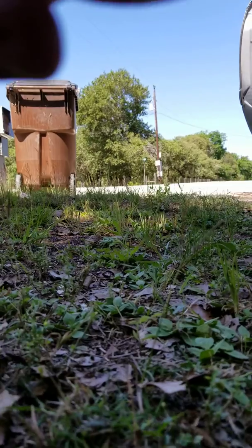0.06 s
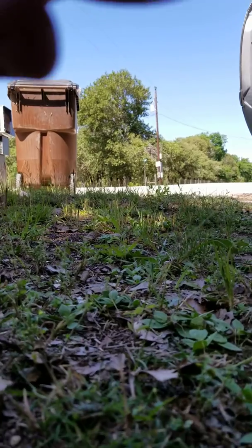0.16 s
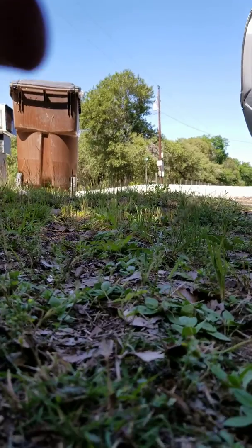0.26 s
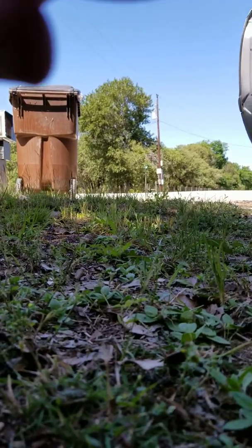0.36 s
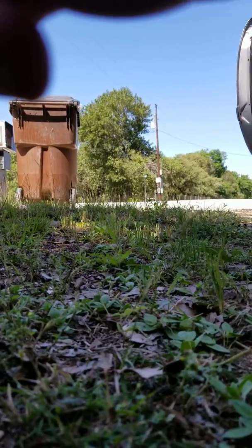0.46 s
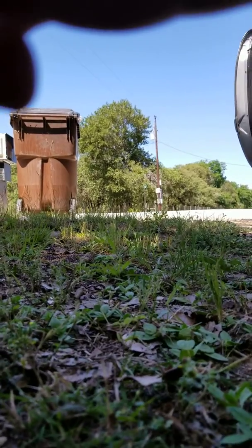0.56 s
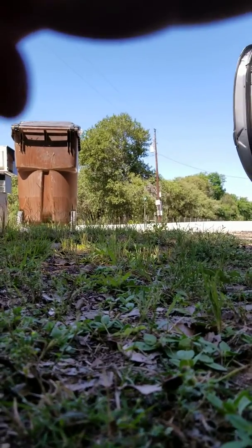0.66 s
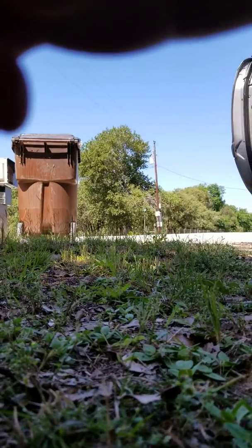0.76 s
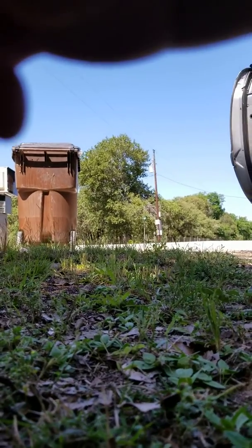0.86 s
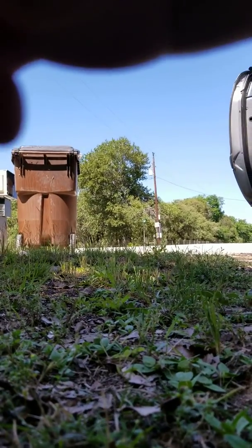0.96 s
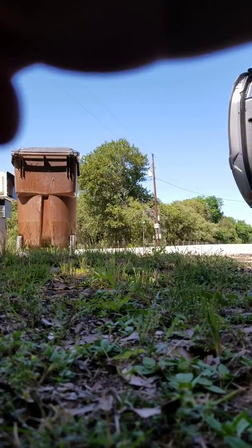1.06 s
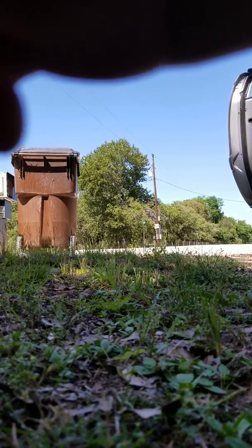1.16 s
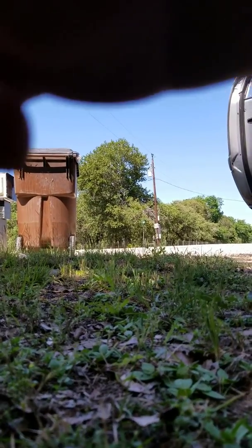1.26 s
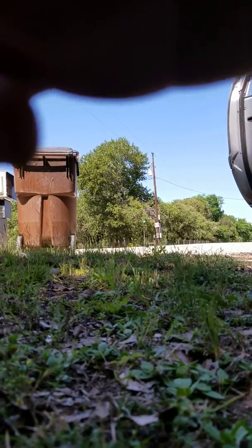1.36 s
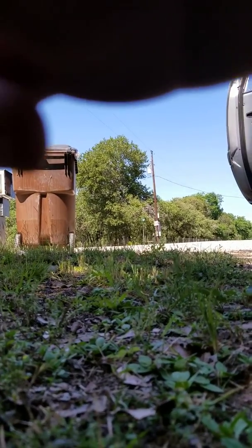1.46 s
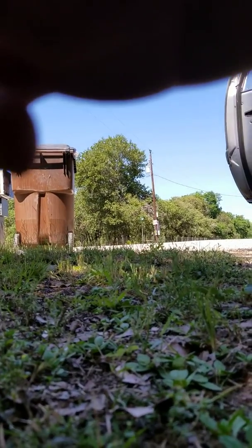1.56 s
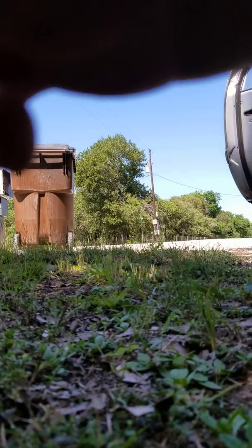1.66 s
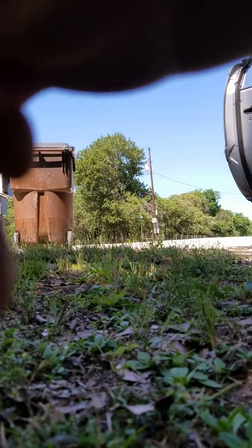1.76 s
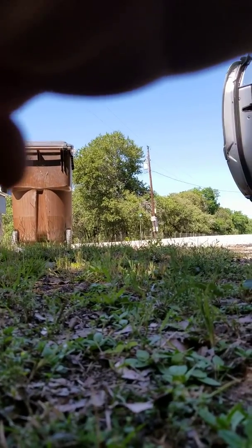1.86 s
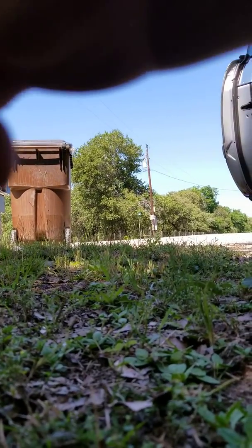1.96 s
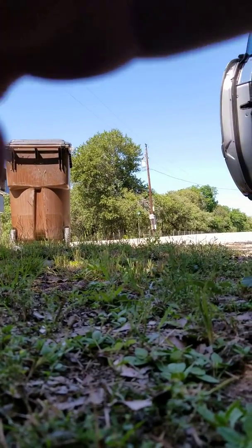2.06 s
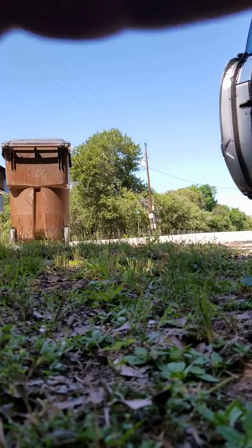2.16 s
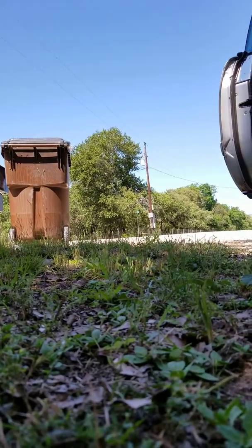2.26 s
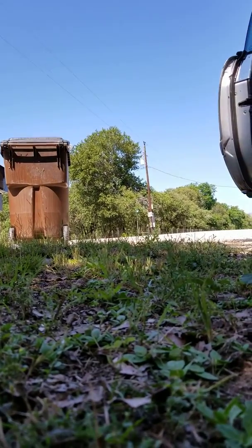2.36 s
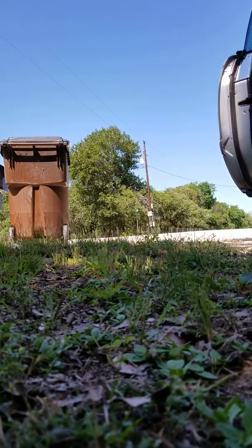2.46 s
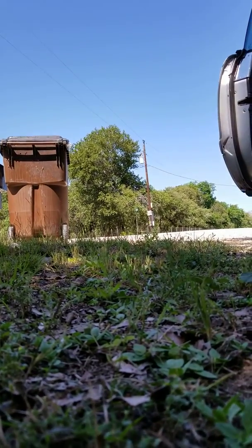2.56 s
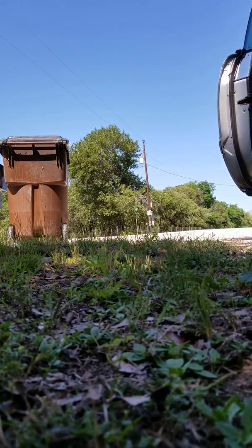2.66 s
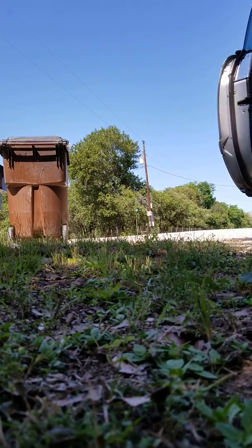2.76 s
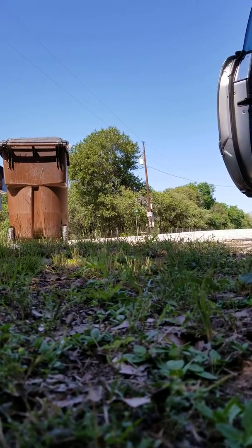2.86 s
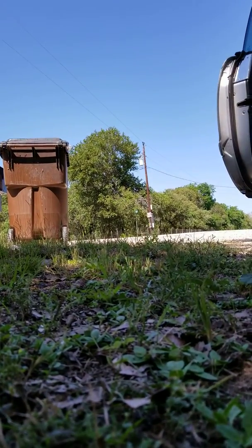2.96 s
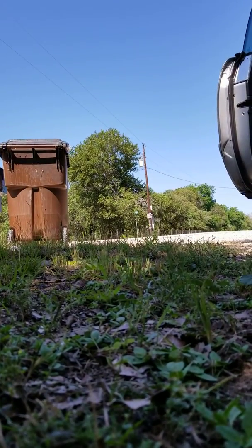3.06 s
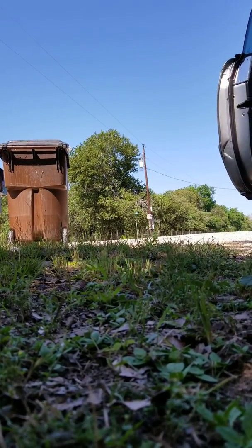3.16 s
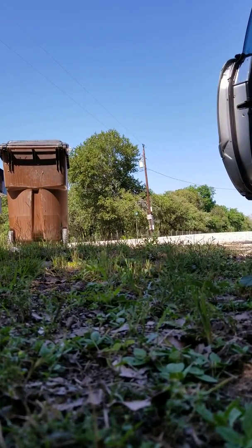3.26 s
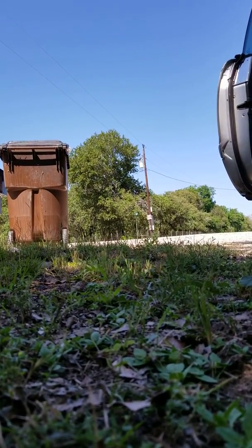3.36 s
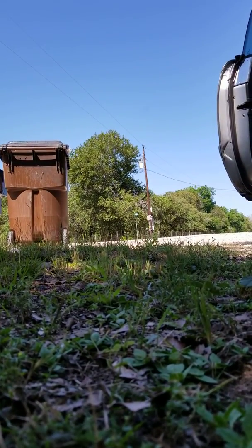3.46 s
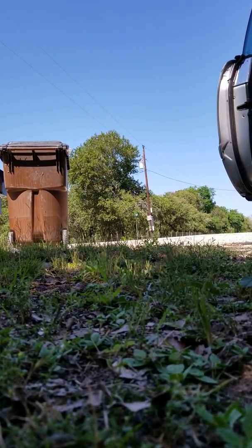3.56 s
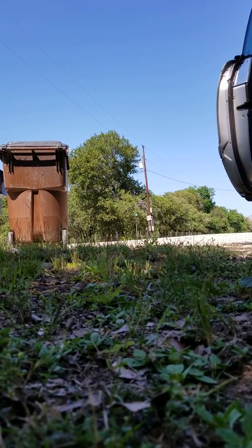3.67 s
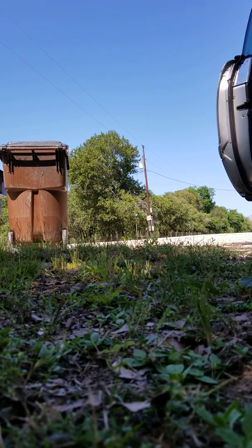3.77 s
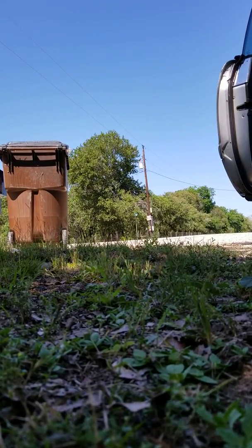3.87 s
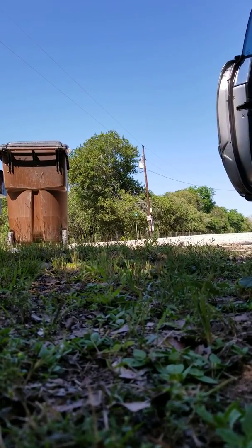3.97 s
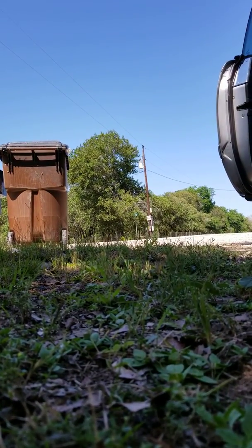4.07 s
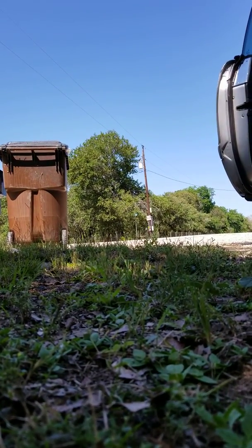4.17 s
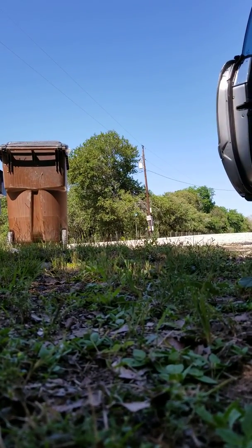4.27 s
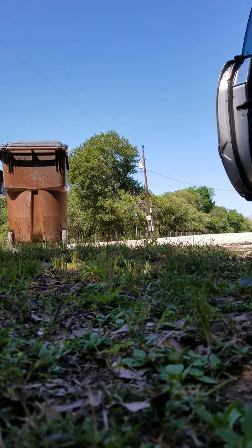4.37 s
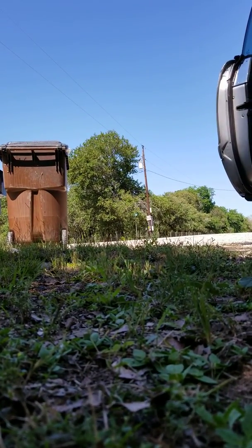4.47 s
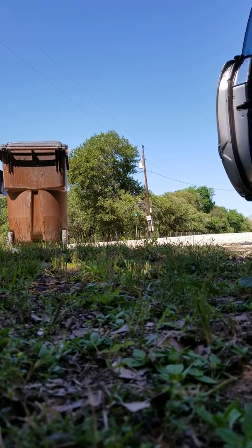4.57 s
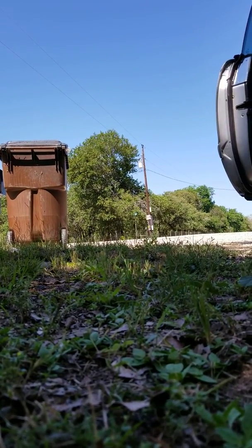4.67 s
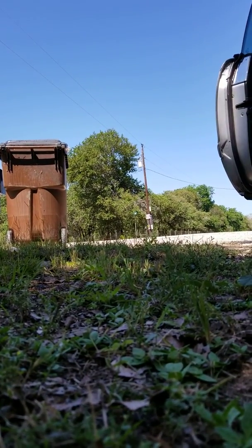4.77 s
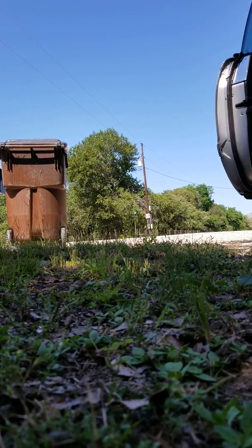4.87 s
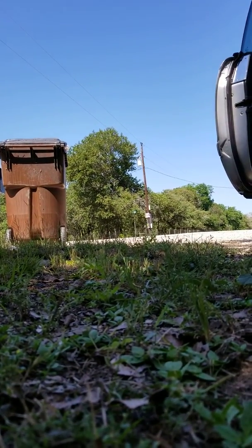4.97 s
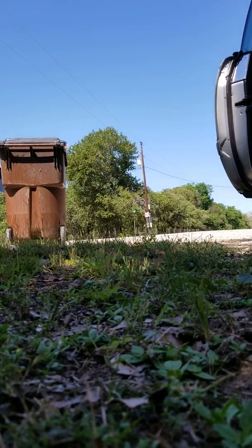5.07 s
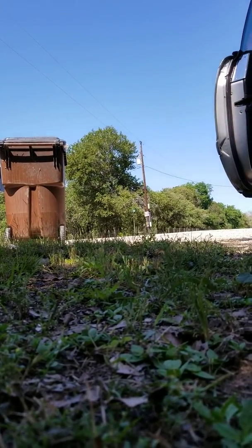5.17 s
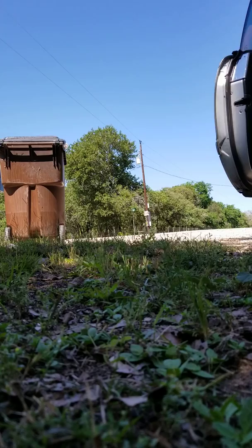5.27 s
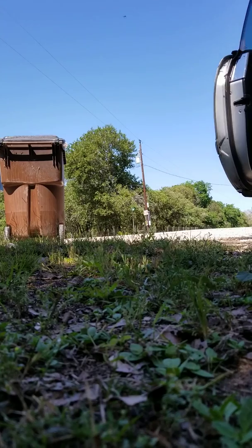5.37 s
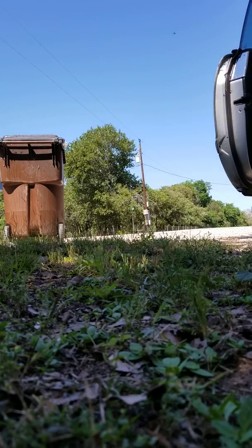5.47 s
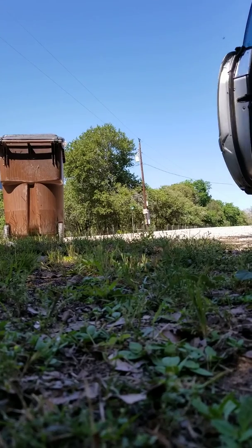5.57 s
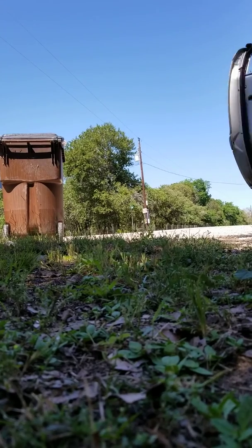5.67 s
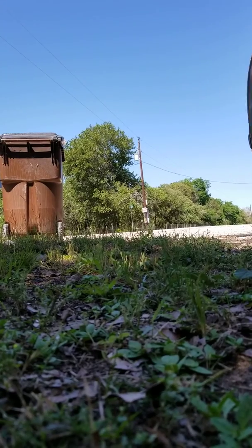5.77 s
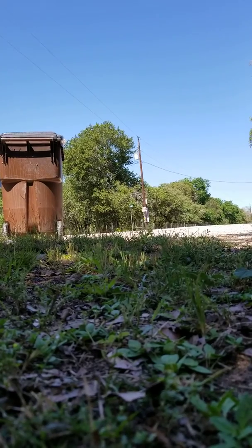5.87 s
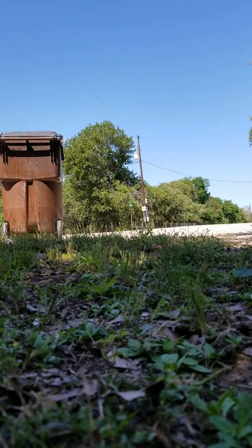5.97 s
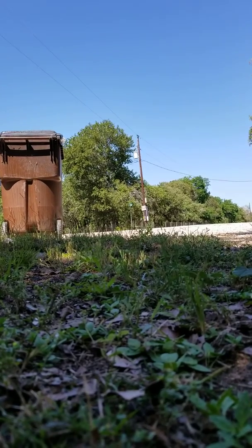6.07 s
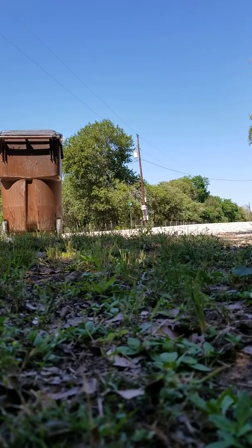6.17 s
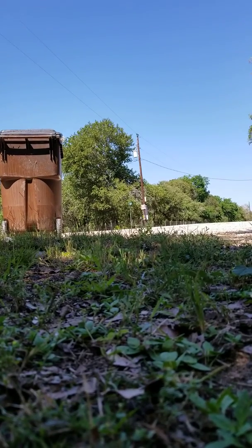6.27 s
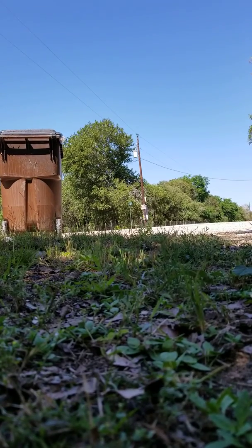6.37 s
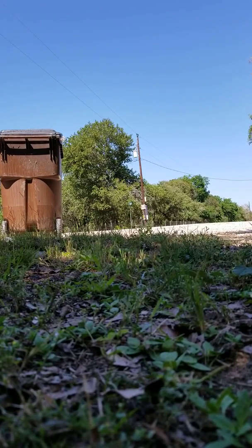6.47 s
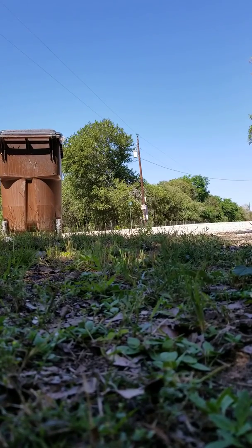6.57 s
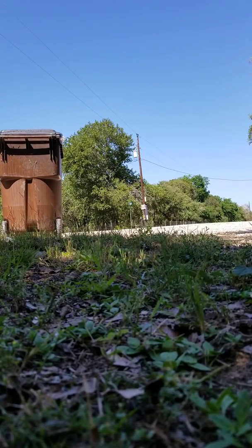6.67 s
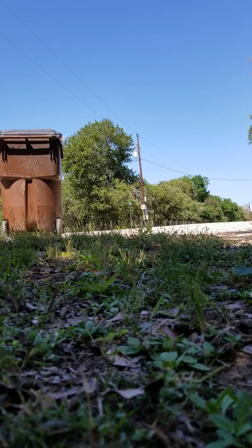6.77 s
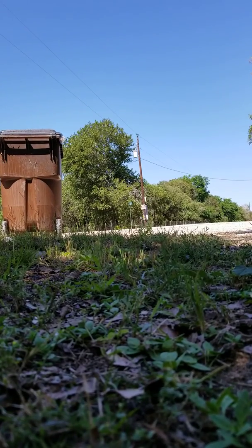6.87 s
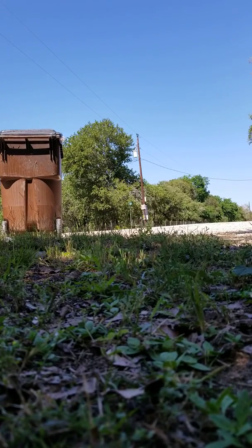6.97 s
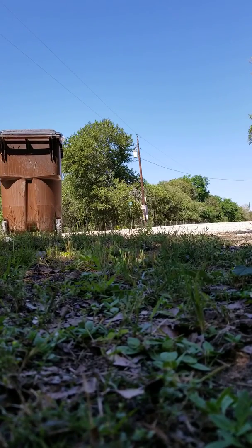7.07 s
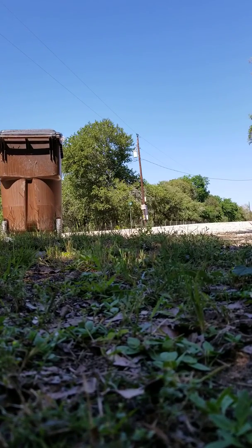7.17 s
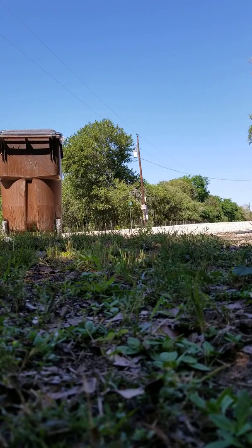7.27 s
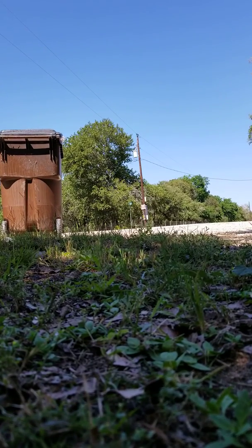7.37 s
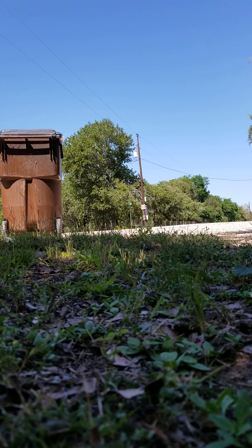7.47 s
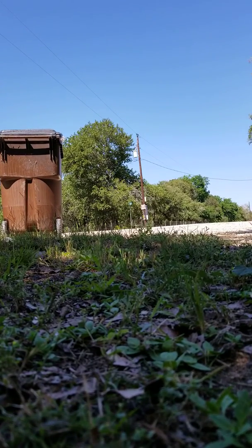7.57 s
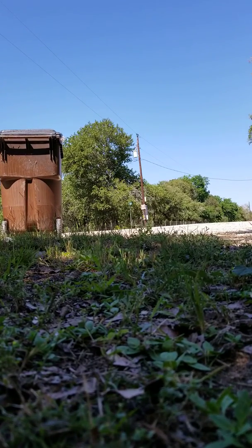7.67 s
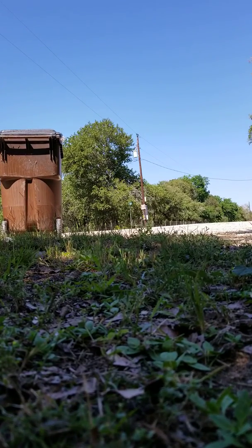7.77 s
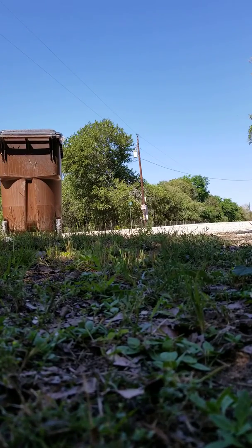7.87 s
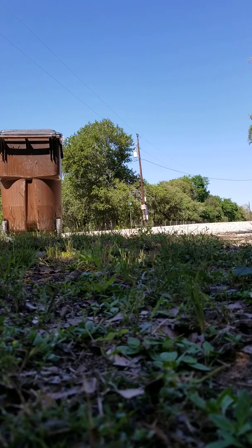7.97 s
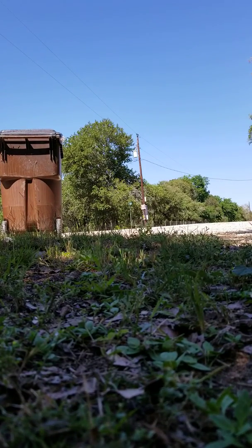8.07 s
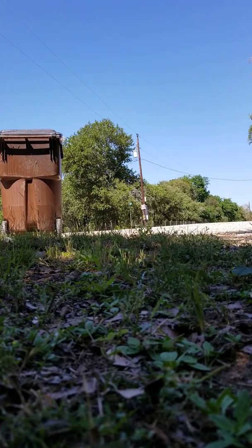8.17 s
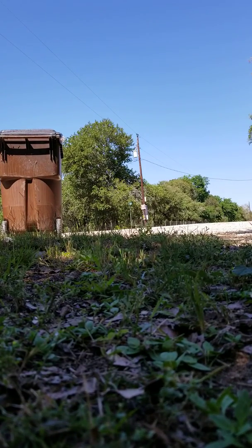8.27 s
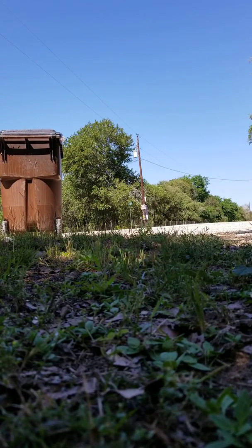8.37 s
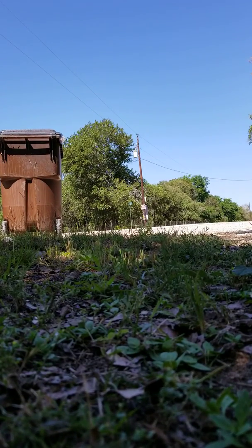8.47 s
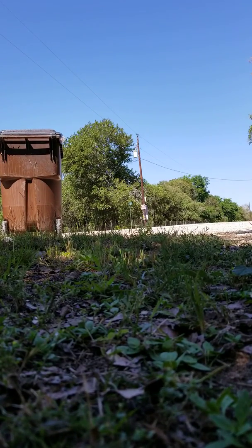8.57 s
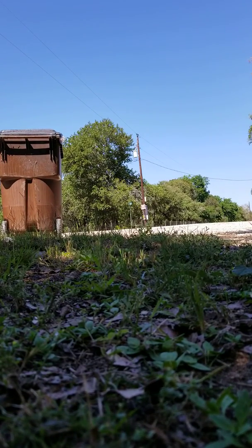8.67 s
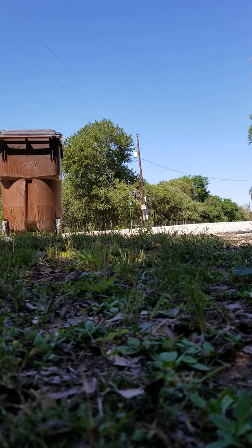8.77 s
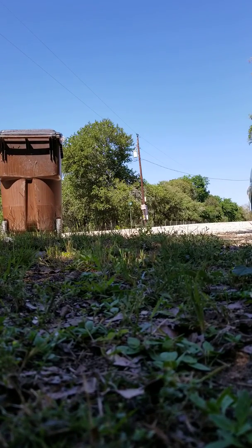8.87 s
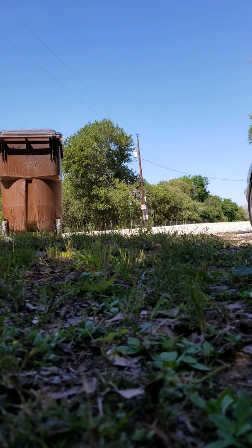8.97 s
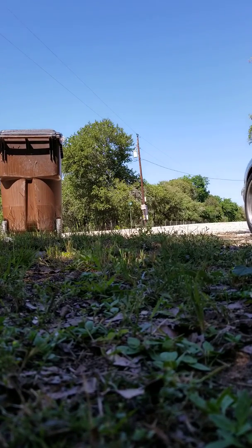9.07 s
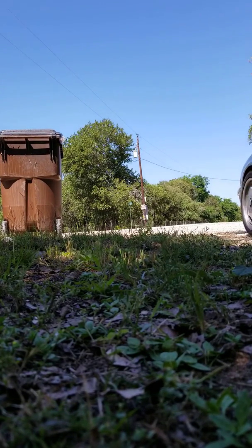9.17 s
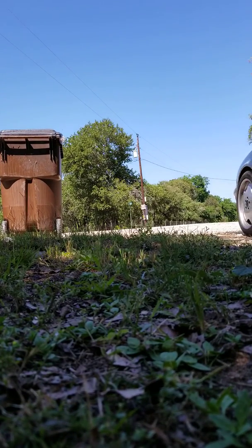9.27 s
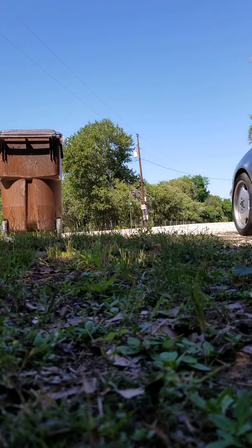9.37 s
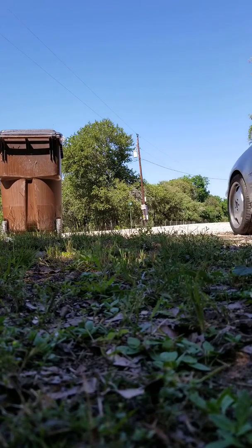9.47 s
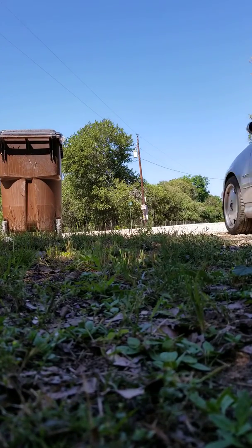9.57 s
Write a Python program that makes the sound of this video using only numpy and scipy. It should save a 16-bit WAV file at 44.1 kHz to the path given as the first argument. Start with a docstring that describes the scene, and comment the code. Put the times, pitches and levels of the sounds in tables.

```python
"""Beside a car, two microphones in a phone held low over the grass: a loud V8 rises out of quiet and lopes at
idle. Unequal firings ring the pipes, gas rasps and the valve gear ticks; right at the phone, fingers rub, tap
and knock. After a soft bump on the phone and a grinding double clunk the engine sags under load, and the car
creeps off on a short blip. Then it pulls away hard: every firing blasts over a crackling jet, pops crack in the
pipes, and the loudest booms overload the microphones."""
import sys
import numpy as np
from scipy import signal
from scipy.fft import rfft, irfft, next_fast_len
from scipy.io import wavfile
from scipy.ndimage import uniform_filter1d

SR = 44100
rng = np.random.default_rng(int(sys.argv[2]) if len(sys.argv) > 2 else 0)


def log_audio(samples):
    """Write samples as a 16-bit WAV file to the path given in sys.argv[1]."""
    # one column per channel
    frames = np.atleast_2d(samples).T
    # limit to full scale, then quantise
    limited = np.clip(frames, -1, 1)
    pcm = np.round(limited * 32767).astype(np.int16)
    wavfile.write(sys.argv[1], SR, pcm)


N = 424683
TIME = np.arange(N) / SR


def amp(db):
    """Decibels to gain."""
    return 10 ** (np.asarray(db) / 20)


def unit(x):
    """Scale to an rms of 1."""
    return x / np.sqrt(np.mean(x ** 2))


def curve(table):
    """The value of a timed table at every sample."""
    return np.interp(TIME, *np.transpose(table))


def pan(db):
    """Left and right gains for a level difference, left minus right, with a mean gain of 1."""
    gains = amp(np.array([[db], [-db]]) / 2)
    return gains / gains.mean()


def colour(x, points, share=1):
    """Causal (minimum-phase) filter with a (Hz, dB) response, so that blows ring after they land."""
    size = 2 * next_fast_len(x.shape[-1] // 2 + SR // 8)
    hz, db = np.transpose(points)
    bin_hz = np.arange(size // 2 + 1) * SR / size + 1
    response_db = share * np.interp(np.log(bin_hz), np.log(hz), db)
    # folding the cepstrum onto positive time makes the filter causal
    cepstrum = irfft(np.log(amp(response_db)))
    cepstrum[1:size // 2] *= 2
    cepstrum[size // 2 + 1:] = 0
    return irfft(rfft(x, size) * np.exp(rfft(cepstrum)), size)[..., :x.shape[-1]]


def hump(hz, below_db, above_db):
    """A broad resonance that has fallen by the given dB two octaves to either side."""
    below = [(hz / 16, 2 * below_db), (hz / 4, below_db), (hz / 2, .8 * below_db)]
    above = [(hz * 2, .6 * above_db), (hz * 4, above_db), (hz * 16, 2 * above_db)]
    return below + [(hz, 0)] + above


def microphone_noise(size, likeness):
    """Noise at the two microphones, partly shared."""
    shared = np.clip(likeness, 0, 1)
    noise = rng.standard_normal((3, size))
    return np.sqrt(shared) * noise[0] + np.sqrt(1 - shared) * noise[1:]


def pulses(turns, places, sizes):
    """A pulse each time the running count of firings reaches one of the places."""
    at = np.searchsorted(turns, places)
    return np.bincount(at, sizes, N + 1)[:N]


def fade(x, seconds):
    """Give every pulse an exponential tail with this time constant."""
    return signal.lfilter([1], [1, -np.exp(-1 / (seconds * SR))], x)


def walk(rate):
    """Chance joined by straight lines through this many random points a second, with a spread near 1."""
    knots = rng.standard_normal(N // 100)
    return np.interp(TIME * rate, np.arange(len(knots)), knots)


def grains(size, per_s, spread_db, seconds):
    """An envelope of small random bursts, some stronger than the rest."""
    sizes = amp(spread_db * np.minimum(rng.exponential(size=size), 4))
    starts = rng.random(size) < per_s / SR
    return unit(fade(sizes * starts, seconds))


def blow(s, db, t60, points, likeness, strike_db, share=1):
    """A sharp strike and a noise burst that dies away in a resonant body, scaled to its peak level."""
    size = SR // 4
    push = microphone_noise(size, likeness) * amp(-60 * TIME[:size] / t60)
    push[:, 0] -= amp(strike_db) * np.sqrt(np.sum(push ** 2) / 2)
    ring = colour(push, points, share)
    out, at = np.zeros((2, N)), int(s * SR)
    out[:, at:at + size] = (ring * amp(db) / np.abs(ring).max())[:, :N - at]
    return out


# how hard the engine works: idle, in gear, a blip, throttle shut, the pull
# (time [s], effort above idle [dB])
EFFORT = [(0.4, -0.5), (3.7, -0.5), (5.0, 0.9), (6.5, 1.8), (6.9, -0.5), (7.2, 2), (7.52, -1), (7.87, 2.5),
          (8.1, -0.5), (8.3, -5.5), (8.45, 0), (8.63, 3), (8.75, 7.5), (8.92, 10.5), (9.15, 11), (9.63, 10)]
FULL_EFFORT_DB = 10.5
# level, dB per dB of effort, dB gained when lugging
BURBLE_DB, BURBLE_PER_EFFORT, BURBLE_LUG_DB = -27, 1.0, 2.0
RASP_DB, RASP_PER_EFFORT, RASP_LUG_DB = -35, 1, -1.1
OVERRUN_BELOW_DB, OVERRUN_RASP = -1.5, 2.7  # throttle shut: rasp added, in dB per dB of effort lost
BLAST_DB, BLAST_PER_EFFORT = -30, 2.4  # blowdown at full effort, and its dB per dB of effort
BLARE_ABOVE_HZ, BLARE_DB_PER_HZ = 79.2, 0.5542  # at high firing rates the blowdown grows into a blare
SWELL_DB, SWELL_S = -14, 0.26  # the exhaust is heard quietly at first, its level rising over the first moments


def exhaust(hz, turns):
    """Speed and effort set the boom, burble, rasp and blowdown; bass reaches the left microphone first."""
    effort_db, lug = curve(EFFORT), lugging(hz)
    overrun_db = np.maximum(OVERRUN_BELOW_DB - effort_db, 0)
    burble_db = BURBLE_DB + BURBLE_PER_EFFORT * effort_db + BURBLE_LUG_DB * lug
    rasp_db = RASP_DB + RASP_PER_EFFORT * effort_db + RASP_LUG_DB * lug + OVERRUN_RASP * overrun_db
    blare_db = BLARE_DB_PER_HZ * np.maximum(hz - BLARE_ABOVE_HZ, 0)
    blast_db = BLAST_DB + BLAST_PER_EFFORT * (effort_db - FULL_EFFORT_DB) + blare_db
    places, sizes, cracks = firings(turns, scatter_db=2.0, jitter=0.036)

    tones = boom(turns, tone_levels(hz, effort_db), effort_db, waver_db=1.25, wobble=0.024)
    tones = tones + lope(turns, effort_db)
    pipes = amp(burble_db) * surge(effort_db) * burble(turns, places, sizes, afterburn=1.0)
    bass = np.array([tones + pipes, np.roll(tones + pipes, 4)])  # 4 samples later on the right

    gas = amp(rasp_db) * rasp(turns, places, cracks, blast_db, crack_db=-9.5, rush_db=6.0, bark_db=-7.5)
    blast = amp(blast_db) * blowdown(turns, places, sizes * cracks ** 0.39,
                                     growl_db=3.5, turbulence_db=0.5, roar_db=-7.5)
    swell = amp(SWELL_DB * np.maximum(1 - TIME / SWELL_S, 0))
    return (bass + muffle(gas + blast, hz, effort_db) + pops()) * swell


# cylinders in firing order (strength [dB], delay [firing intervals], crack [dB])
CYLINDERS = [(-6, 0.0215, 10.5), (0.5, 0.034, 1), (-1.5, -0.1036, 7.5), (-3.5, -0.225, 2), (3, 0.0375, 1),
             (0.5, -0.186, 6.5), (-1.5, 0.059, 8.5), (-2, 0.022, 5)]


def firings(turns, scatter_db, jitter):
    """Place, strength and crack of each firing: every cylinder has its habit, no two burns are alike."""
    index = np.arange(int(turns[-1]) + 1)
    db, delay, crack_db = np.array(CYLINDERS)[index % len(CYLINDERS)].T
    chance = rng.standard_normal((len(index), 3)).T
    places = index + .42 + delay + jitter * chance[0]
    sizes = amp(db + scatter_db * chance[1])
    cracks = amp(crack_db + 3.0 * np.clip(chance[2], -2, 2))
    return places, sizes, cracks


LUG_BELOW_HZ, LUG_RANGE_HZ = 48.2, 3  # firing rates: dragged below its idle speed, the engine lugs


def lugging(hz):
    """0 at idle speed and above, 1 when the load has dragged the engine well below it."""
    return np.clip((LUG_BELOW_HZ - hz) / LUG_RANGE_HZ, 0, 1)


# how loudly the pipes boom on an even tone at idle effort (frequency [Hz], level [dB])
BOOM = [(42, -40.5), (49, -42.5), (55, -26), (63, -23), (97, -23), (122, -27), (160, -23), (200, -25),
        (225, -30.5), (290, -33.5)]
# firing tone, its octave, its twelfth
# (level over the boom [dB], growth [dB per dB of effort], gain when lugging [dB])
TONES = [(0.5, 1, -11), (1, 1, -6), (-9.5, 1.93, 9.5)]


def tone_levels(hz, effort_db):
    """Three tones slide through the pipe boom and grow with effort; lugging favours the twelfth."""
    boom_hz, boom_db = np.transpose(BOOM)
    levels_db = []
    for k, (db, slope, lug_db) in enumerate(TONES):
        pipe_db = np.interp(np.log((k + 1) * hz), np.log(boom_hz), boom_db)
        levels_db.append(pipe_db + db + slope * effort_db + lug_db * lugging(hz))
    return levels_db


STEADY_SHARE = 0.99  # share of the crank's unsteadiness that full effort takes away


def boom(turns, levels_db, effort_db, waver_db, wobble):
    """The even pulsation: the firing tone and two overtones from a crank that steadies under load."""
    unsteady = 1 - STEADY_SHARE * np.clip(effort_db / FULL_EFFORT_DB, 0, 1)
    phase = 2 * np.pi * (turns - .5 + wobble * unsteady * walk(30))
    tones = 0
    for k, db in enumerate(levels_db):
        # only the overtones waver in level
        level = amp(db + waver_db * unsteady * k * walk(18))
        tones = tones + np.sqrt(2) * level * np.sin((k + 1) * phase)
    return tones


# lope of the two unequal banks (multiple of the eight-firing cycle, level [dB])
LOPE = [(8, -38), (9, -45), (10, -34), (14, -36.5), (18, -41.5), (22, -36.5), (23, -36), (29, -39),
        (34, -37.5), (35, -37.5), (46, -46.5)]


def lope(turns, effort_db):
    """The unequal banks add wandering harmonics of the eight-firing cycle, eased only past full effort."""
    share = np.clip(2.0 - effort_db / FULL_EFFORT_DB, 0, 1)
    cycle = 2 * np.pi * turns / len(CYLINDERS)
    tones = 0
    for k, db in LOPE:
        tones = tones + np.sqrt(2) * amp(db + walk(1.8)) * np.cos(round(k) * (cycle - np.pi))
    return share * tones


SURGE_PER_S, SURGE_DB = 15, 2.4  # random points per second, and their spread at idle


def surge(effort_db):
    """At idle the burn swells and sags several times a second; it evens out under load."""
    idle = np.clip(1 - effort_db / FULL_EFFORT_DB, 0, 1)
    return amp(SURGE_DB * idle * (np.clip(walk(SURGE_PER_S), -2, 2) - .2))


# pipe response to one firing (frequency [Hz], level [dB])
PIPE = [(25, -28), (42, -14.5), (58, 0.5), (80, -9.5), (103, -2), (135, 2), (175, 0), (215, -0.5),
        (270, -4), (320, -13.5), (385, -20), (450, -22.5), (700, -46.5), (1300, -51.5), (9000, -102)]


def burble(turns, places, sizes, afterburn):
    """The uneven pulsation: what sets each firing apart from the mean rings the pipes."""
    chance = rng.random((len(places), 2)).T
    # each firing is trailed by a second, looser surge of gas, so that no two ring alike
    trailing_sizes = afterburn * sizes * (2 * chance[1] - 1)
    trailing = pulses(turns, places + .12 + 0.558 * chance[0], trailing_sizes)
    ring = colour(pulses(turns, places, sizes) + trailing, PIPE)
    # take out the firing tone and two overtones, which the boom supplies
    span = SR // 6
    for k in range(1, 4):
        for wave in (np.cos(2 * np.pi * k * turns), np.sin(2 * np.pi * k * turns)):
            ring = ring - 2 * wave * uniform_filter1d(ring * wave, span)
    return ring / np.sqrt(uniform_filter1d(ring ** 2, 2 * span))


# rasp of the gas at the tailpipe, with its resonances (frequency [Hz], level [dB])
GAS = [(200, 6), (380, 5.5), (470, 1), (535, 5.5), (630, -1.5), (770, 1.5), (880, -5.5), (945, 0.5),
       (1030, -6), (1170, -4), (1270, -3), (1420, -7.5), (1620, -7.5), (1800, -15.5), (2100, -18.5),
       (3000, -19.5), (4800, -31), (7000, -46.5), (16000, -38)]
RUSH_YIELDS_DB = -23  # blowdown level that halves the steady rush


def rasp(turns, places, cracks, blast_db, crack_db, rush_db, bark_db):
    """Firings crack and puff at the tailpipe over a steady rush that yields as the throttle opens."""
    kicks = pulses(turns, places, cracks)
    coasting = 1 / (1 + amp(blast_db - RUSH_YIELDS_DB))
    puffs = unit(fade(kicks, 0.016)) + amp(rush_db) * coasting
    knock = amp(bark_db) * coasting * bark(turns, places, cracks, scatter_db=4.5)
    return tailpipe(unit(puffs), amp(crack_db) * unit(kicks), GAS) + knock


# the knock of a hard firing in the pipes (frequency [Hz], level [dB])
BARK = [(120, -22), (280, 1.5), (420, 2), (540, -1.5), (650, -5.5), (780, -0.5), (1000, -12.5),
        (1300, -17.5), (2000, -35.5), (6000, -59)]


def bark(turns, places, cracks, scatter_db):
    """Some firings burn harder than the rest and cough in the pipes, as short bursts of noise."""
    chance = np.clip(rng.standard_normal(len(places)), -2, 1.4)
    kicks = pulses(turns, places, np.sqrt(cracks) * amp(scatter_db * chance))
    coughs = fade(fade(kicks, .002), .002)
    return unit(colour(coughs * rng.standard_normal(N), BARK))


# balance of the tailpipe gas at the two microphones (frequency [Hz], left minus right [dB])
GAS_BALANCE = [(300, -.6), (700, -3.5), (1250, -9), (1800, -9), (2400, -6), (3200, -1), (4400, 3),
               (7000, 0), (12000, -2)]


def tailpipe(puffs, kicks, points):
    """Gas noise, alike in the lows at both microphones; its scattered treble reaches the left one first."""
    gas = colour(puffs * rng.standard_normal(N) + kicks, points)
    stray = colour(puffs * rng.standard_normal(N), points)
    high_pass = signal.butter(4, 1100, "high", fs=SR, output="sos")
    treble, spread = signal.sosfiltfilt(high_pass, [gas, .7 * stray])
    pair = gas - treble + np.array([treble + spread, np.roll(treble - spread, 6)])
    size = 2 * next_fast_len(N // 2 + 1)
    tilt_db = np.interp(np.fft.rfftfreq(size, 1 / SR), *np.transpose(GAS_BALANCE))
    balance = amp(np.array([tilt_db, -tilt_db]) / 2)
    return unit(irfft(rfft(pair, size) * balance, size)[:, :N])


DULL_ABOVE_HZ, DULL_DB = 3260, -11.5  # at open throttle and low speed the gas lacks its top
BRIGHT_FROM_HZ, BRIGHT_RANGE_HZ = 73.4, 17  # firing rate over which the top opens up


def muffle(x, hz, effort_db):
    """Heavy, slow blasts are dull; their top opens as the engine gathers speed."""
    slow = 1 - np.clip((hz - BRIGHT_FROM_HZ) / BRIGHT_RANGE_HZ, 0, 1)
    low = signal.sosfiltfilt(signal.butter(3, DULL_ABOVE_HZ, fs=SR, output="sos"), x)
    return low + (x - low) * amp(DULL_DB * slow * np.clip(effort_db / FULL_EFFORT_DB, 0, 1))


# ring of the valve gear (frequency [Hz], level [dB])
METAL = [(1500, -16.5), (3300, 4), (3850, 5), (4400, -11), (5200, -3), (6050, 2.5), (6800, -8.5),
         (9700, -12), (12200, -1), (15500, -11)]
# thin hiss of the running engine (frequency [Hz], level [dB])
HISS = [(1500, 18.5), (3500, -1.5), (6000, -1.5), (9300, -12), (11800, -4.5), (13500, -7), (15500, -13)]


def valve_gear(turns, scatter_db, hiss_db):
    """Loose metal ticks on about every second firing over a thin hiss."""
    places = np.arange(1, turns[-1], 2)
    chance = rng.standard_normal((len(places), 2)).T
    sizes = amp(scatter_db * np.tanh(chance[0]))
    ticks = fade(fade(pulses(turns, places + 0.11 + 0.46 * chance[1], sizes), 0.0018), 0.0061)
    metal = colour(ticks * rng.standard_normal(N), METAL)
    ring = unit(scatter(metal, ground_db=2.0, t60=0.073))
    return unit(ring + amp(hiss_db) * unit(colour(microphone_noise(N, 0.26), HISS)))


def scatter(x, ground_db, t60):
    """Ground and bodywork scatter the treble differently to each microphone; the left is reached first."""
    size = SR // 20
    noise = rng.standard_normal((2, size)) * amp(-60 * TIME[:size] / t60)
    tails = colour(noise, [(250, -20.0), (600, -11.5), (1400, -0.5), (16000, -14.0)])
    tails = tails / np.sqrt((tails ** 2).sum(axis=1, keepdims=True))
    direct = np.array([x, np.roll(x, 5)])
    return direct + amp(ground_db) * signal.fftconvolve(x[None], tails, axes=1)[:, :N]


# fingers sliding on the phone, right at the microphones
# (time [s], half length [s], level before panning [dB], resonance [Hz], left minus right [dB])
RUBS = [(0.039, 0.014, -38.5, 5000, -23), (0.24, 0.035, -45, 11030, -12), (0.269, 0.0095, -26, 6200, 1),
        (0.288, 0.014, -25.5, 6500, -4), (0.339, .05, -47.5, 4780, 22), (1.09, 0.073, -47, 13000, -27),
        (1.167, 0.017, -39.5, 11100, -21), (1.247, 0.035, -40.5, 12200, -19),
        (1.428, 0.029, -32.5, 12100, -24), (1.432, 0.024, -32.5, 3800, -5), (1.559, 0.023, -41, 5040, 7),
        (1.692, 0.026, -40.5, 3480, 13), (2.805, 0.073, -41, 2200, -2), (2.837, 0.0052, -44, 9000, 5),
        (3.139, 0.028, -32, 1800, -2), (5.668, 0.026, -52.5, 12000, 7), (6.277, 0.016, -42, 8900, 5),
        (8.236, 0.0094, -38, 5512, 2), (8.324, 0.0044, -35, 3990, -1)]


def fingers(grain_db, grit_per_s, grit_s, jerk_db):
    """Skin sticks and slips on the case in short, gritty, jerky strokes of noise."""
    out = np.zeros((2, N))
    jerks = amp(jerk_db * np.tanh(walk(180)))
    for s, half, db, hz, pan_db in RUBS:
        near = np.abs(TIME - s) < 3 * half
        size = near.sum()
        grit = grains(size, grit_per_s, grain_db, grit_s)
        skin = colour(jerks[near] * grit * microphone_noise(size, 0.054), [(400, -7.5), (1500, -9)])
        stroke = unit(colour(skin, hump(hz, -0.34, -19.0)))
        out[:, near] += stroke * np.exp(-((TIME[near] - s) / half) ** 2) * amp(db) * pan(pan_db)
    return out


# fingers tap and creak on the phone (time [s], peak level before panning [dB], ring [Hz], t60 [s],
# left minus right [dB], how narrowly it rings [share of the full resonance, held to 0.3-1.2])
TAPS = [(0.042, -21, 950, 0.065, -29, 0.86), (.269, -15, 5000, 0.0088, 15, 1.2),
        (.287, -18, 5200, .01, 0, 1), (0.299, -28, 4500, 0.0067, 0, 1), (1.078, -22, 12900, 0.0072, -24, 1),
        (1.256, -11, 13300, 0.0046, -34, 1), (2.789, -13, 2160, 0.0081, -5, 1.1),
        (2.816, -23, 2850, 0.018, 3, 0.9), (3.842, -27, 2400, 0.027, -2, 0.7),
        (3.894, -22, 1080, 0.017, 6, 1), (4.437, -29, 4400, 0.025, 7, 1.2),
        (4.93, -18, 1080, 0.025, 0, 0.69), (5.315, -15, 1500, 0.0018, 1, 0.4),
        (8.288, -18, 750, 0.021, -3.5, 1), (8.325, -11, 752, 0.016, -4, 0.65)]


def taps():
    """Each tap is a strike and a brief burst ringing in one broad resonance of the case."""
    out = np.zeros((2, N))
    for s, db, hz, t60, pan_db, focus in TAPS:
        tap = blow(s, db, t60, hump(hz, -9, -39.5), 0.57, strike_db=-2, share=np.clip(focus, .3, 1.2))
        out += tap * pan(pan_db)
    return out


# hard knocks of plastic on plastic
# (time [s], peak level before panning [dB], brightness [dB per octave])
KNOCKS = [(2.8417, -6, 0.5), (2.855, -10, -3), (2.868, -19, -2.5), (3.138, -11.5, -1), (3.153, -15.5, -1),
          (3.171, -24.5, 1)]
# what the knocked plastic rings with (frequency [Hz], level [dB])
PLASTIC = [(250, -20), (600, -11), (850, -7), (1050, -3), (1200, -1), (1450, 4.5), (1730, 4), (1980, -7.5),
           (2900, -12.5), (3500, -13.5), (4100, -15), (5500, -30), (7500, -45), (15000, -28)]


def plastic_knocks():
    """Hard strikes ring the plastic, each with its own tilt between bass and treble."""
    out = np.zeros((2, N))
    for s, db, tilt in KNOCKS:
        ring = [(hz, ring_db + tilt * np.log2(hz)) for hz, ring_db in PLASTIC]
        out += blow(s, db, .045, ring, 0.53, strike_db=2)
    return out * pan(-7)


# soft, hollow bumps on the case (time [s], level before onset and panning [dB], ring [Hz], t60 [s])
BUMPS = [(3.1365, -20, 625, 0.03), (3.763, -22.5, 1080, 0.039), (3.894, -14.5, 790, 0.02),
         (4.93, -17, 700, 0.025), (6.003, -19.5, 680, 0.074)]


def bumps(contact_s, overtone, overtone_db):
    """A soft fingertip sets the case ringing on one low note and a weaker overtone."""
    out = np.zeros(N)
    age = TIME[:SR // 4]
    for s, db, hz, t60 in BUMPS:
        ring = np.sin(2 * np.pi * hz * age) + amp(overtone_db) * np.sin(2 * np.pi * overtone * hz * age)
        at = int(s * SR)
        out[at:at + len(age)] += ring * amp(db - 60 * age / t60) * (1 - np.exp(-age / contact_s))
    return out * pan(-5)


# clunks: a soft one, then a double one as the load comes on
# (time [s], body peak [dB], latch peak [dB], thump peak [dB])
CLUNKS = [(4.4311, -19, -37, -9), (6.5272, -3.5, -13.5, -21), (6.5594, -6, -14.5, -2)]
# what the clunk rings with: heavy body, bright latch, low thump (frequency [Hz], level [dB])
CLUNK_BODY = [(25, -22), (70, 0), (200, -5), (400, -2), (630, 6.5), (720, 1), (830, 5), (960, -6),
              (1100, -2), (1500, -17.5), (2500, -40), (6000, -66)]
CLUNK_LATCH = [(1200, -9), (2800, -9.5), (3600, -7.5), (4050, 5), (4700, -8), (6600, -9.5), (9000, -23),
               (12000, -15), (15500, -16.5)]
THUMP = [(25, -8), (70, 4), (125, -2.5), (170, 3.5), (300, -10), (600, -45), (3000, -88)]


def clunks():
    """Each clunk is a bright latch, then within milliseconds the thump and the heavy body."""
    out = np.zeros((2, N))
    for s, body_db, latch_db, thump_db in CLUNKS:
        out += blow(s, latch_db, .1, CLUNK_LATCH, 0.11, strike_db=-13.5)
        out += blow(s + 0.0027, thump_db, 0.11, THUMP, 0.97, strike_db=6)
        out += blow(s + 0.00375, body_db, .055, CLUNK_BODY, 0.83, strike_db=1.0)
    return out


# a quick rise, a hold and a slow release around the double clunk
CRUNCH_FROM_S, CRUNCH_UNTIL_S, CRUNCH_RISE_S, CRUNCH_T60_S = 6.517, 6.568, .016, .14
CRUNCH_BODY_DB, CRUNCH_LATCH_DB = -20, -33


def crunch():
    """Parts grind and rattle against each other through the double clunk: gritty noise in its resonances."""
    size = SR // 3
    at = int(CRUNCH_FROM_S * SR)
    t = TIME[at:at + size]
    rise = np.clip((t - CRUNCH_FROM_S) / CRUNCH_RISE_S, 0, 1)
    release = amp(-60 * np.maximum(t - CRUNCH_UNTIL_S, 0) / CRUNCH_T60_S)
    grit = grains(size, per_s=1400, spread_db=1.2, seconds=0.0011)
    body = amp(CRUNCH_BODY_DB) * unit(colour(grit * microphone_noise(size, 0.68), CLUNK_BODY))
    latch = amp(CRUNCH_LATCH_DB) * unit(colour(grit * microphone_noise(size, .2), CLUNK_LATCH))
    out = np.zeros((2, N))
    out[:, at:at + size] = rise * release * (body + latch)
    return out


# colour of the blowdown (frequency [Hz], level [dB])
BLARE = [(250, -16.5), (420, 2), (620, 11), (900, 5), (1300, -4), (2000, -2.5), (2800, -13), (3800, -9.5),
         (5200, -17.5), (6000, -33.5), (6800, -42.5), (9000, -36.5), (12000, -27.5), (16000, -47.5)]
# upper pipe resonances that hard firings wake (frequency [Hz], level [dB])
GROWL = [(120, -39), (230, -18.5), (290, 1), (330, 8.5), (385, 5.5), (450, -8), (620, -19.5), (900, -21),
         (2000, -48), (9000, -93)]
CRACKLE_PER_S, CRACKLE_S = 770, 0.0019  # eddies that burst in the jet: rate and decay


def blowdown(turns, places, sizes, growl_db, turbulence_db, roar_db):
    """Firings burst out as short blasts over a crackling jet and wake the upper pipe resonances."""
    lateness = 0.045 * rng.standard_normal(len(places))  # firing intervals, early or late
    kicks = pulses(turns, places + lateness, sizes)
    bursts = fade(fade(kicks, .0006), .0024)
    evenness = 1 / np.sqrt(uniform_filter1d(bursts ** 2, SR // 8) + 1e-9)
    turbulence = unit(bursts * evenness * rng.standard_normal(N))
    growl = unit(colour(unit(kicks * evenness) + amp(turbulence_db) * turbulence, GROWL))
    crackle = amp(roar_db) * grains(N, CRACKLE_PER_S, spread_db=2.5, seconds=CRACKLE_S)
    return tailpipe(np.hypot(bursts * evenness, crackle), 0, BLARE) + amp(growl_db) * growl


# the loudest exhaust pops under load (time [s], peak level before panning [dB], ring [Hz], t60 [s])
POPS = [(8.875, -15.5, 1470, .025), (8.892, -25, 1980, 0.035), (8.923, -23, 2000, .02),
        (8.969, -16, 1630, 0.025), (9.008, -11, 1210, 0.023), (9.042, -18, 1704, 0.037),
        (9.086, -25, 1510, 0.02), (9.112, -15, 1170, 0.022), (9.151, -14, 800, 0.014),
        (9.191, -22, 1500, 0.024), (9.217, -11.5, 1180, .025), (9.271, -7, 617, 0.11),
        (9.305, -11, 754, 0.027), (9.315, -12.5, 1000, 0.018), (9.333, -9.5, 665.7, 0.032),
        (9.387, -30, 2320, 0.0063), (9.411, -17, 1800, 0.017), (9.446, -26.5, 1479, 0.016),
        (9.532, -15.5, 1780, 0.018), (9.563, -14, 1600, 0.028), (9.584, -5, 1289, .02),
        (9.614, -10.5, 1820, .02)]


def pops():
    """Stray charges go off in the hot pipes with a sharp crack."""
    out = np.zeros((2, N))
    for s, db, hz, t60 in POPS:
        out += blow(s, db, t60, hump(hz, -14, -41), .8, strike_db=-6)
    return out * pan(-6)


# engine speed (time [s], firings per second [Hz])
SPEED = [(0.0, 48.45), (1.9, 48.32), (3.3, 49.12), (4.3, 48.18), (5.2, 49.3), (5.9, 48.28), (6.62, 47.96),
         (6.95, 43.8), (7.44, 43.48), (7.77, 61.84), (7.92, 61.5), (8.15, 47.21), (8.32, 41.93),
         (8.67, 47.37), (8.95, 65.07), (9.2, 77.78), (9.63, 97.54)]
# ticking and hiss together (time [s], level [dB])
VALVES = [(0, -49.5), (0.6, -41.5), (2.0, -49.5), (2.7, -44), (3.5, -48), (5.1, -47), (5.65, -40.5),
          (6.05, -47), (7.4, -49.5), (7.85, -59), (8.25, -41), (8.6, -41), (8.9, -51), (9.6, -41)]


def scene():
    """The engine speed drives the exhaust and the valve gear; the clunks and the grinding come at set times,
    and the handling sounds are right at the phone."""
    hz = curve(SPEED)
    turns = np.cumsum(hz) / SR  # running count of firings
    valves = amp(curve(VALVES)) * valve_gear(turns, scatter_db=3.0, hiss_db=10.5)
    car = exhaust(hz, turns) + valves + clunks() + crunch()
    rubs = fingers(grain_db=1.0, grit_per_s=1100, grit_s=0.00093, jerk_db=3.0)
    hollow = bumps(contact_s=0.0014, overtone=1.42, overtone_db=-9)
    return car + rubs + taps() + plastic_knocks() + hollow


LOW_CUT_HZ, TOP_HZ = 12, 15750


def record(dry):
    """The microphones flatten the loudest booms; the deepest bass and the top are cut."""
    lean = signal.sosfilt(signal.butter(2, LOW_CUT_HZ, "high", fs=SR, output="sos"), dry)
    rounded = lean / (1 + np.abs(lean / 1.04) ** 8) ** (1 / 8)  # nears a ceiling of 1.04
    return signal.sosfiltfilt(signal.ellip(8, .1, 60, TOP_HZ, fs=SR, output="sos"), rounded)


dry = scene()
out = record(dry)
log_audio(out)
```